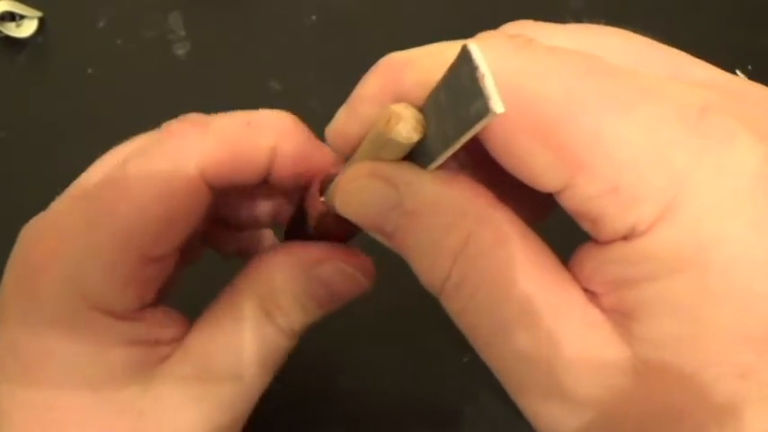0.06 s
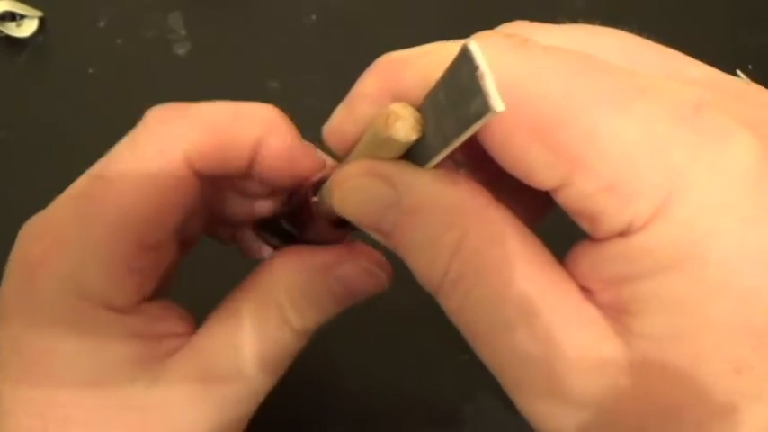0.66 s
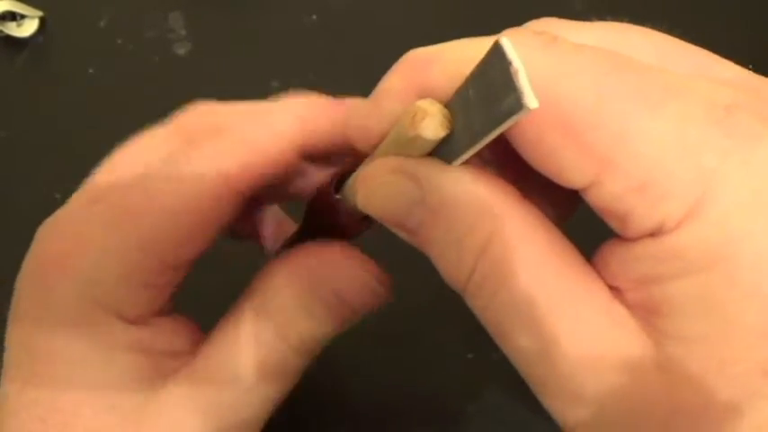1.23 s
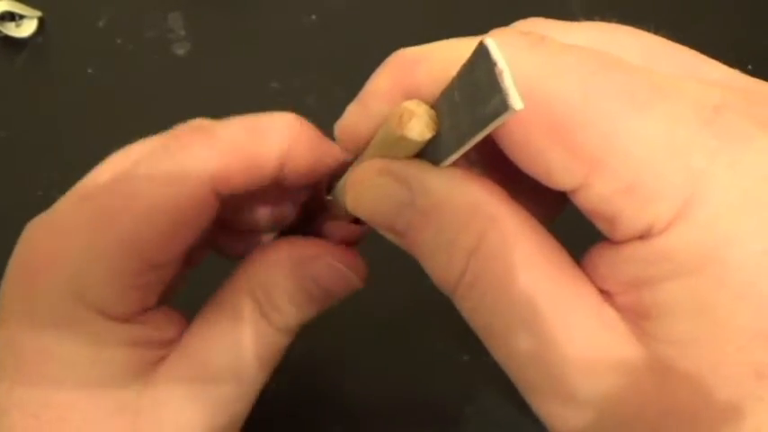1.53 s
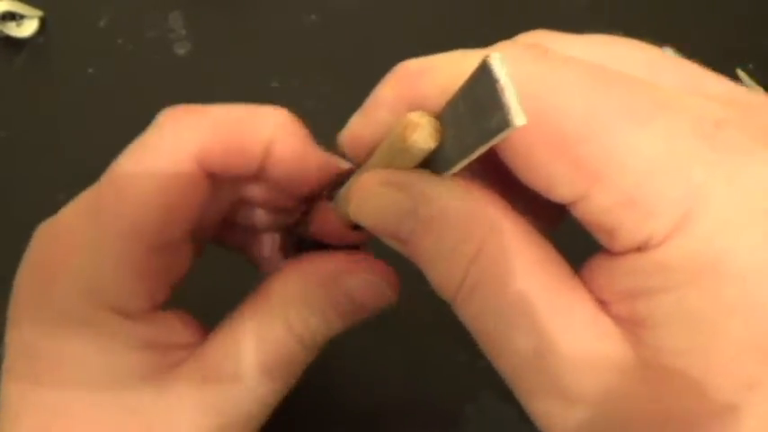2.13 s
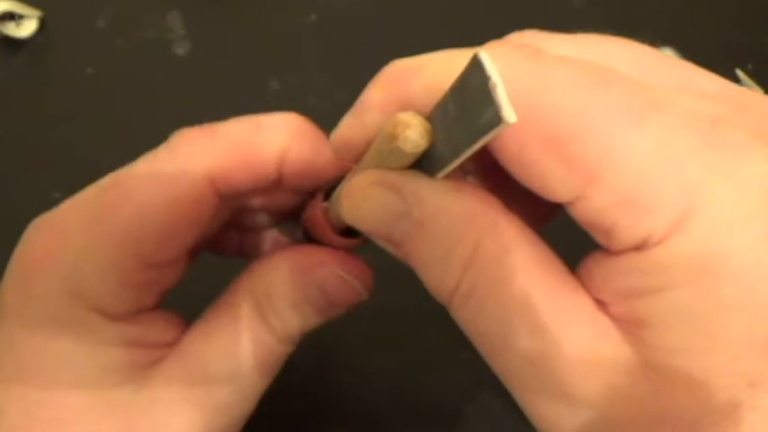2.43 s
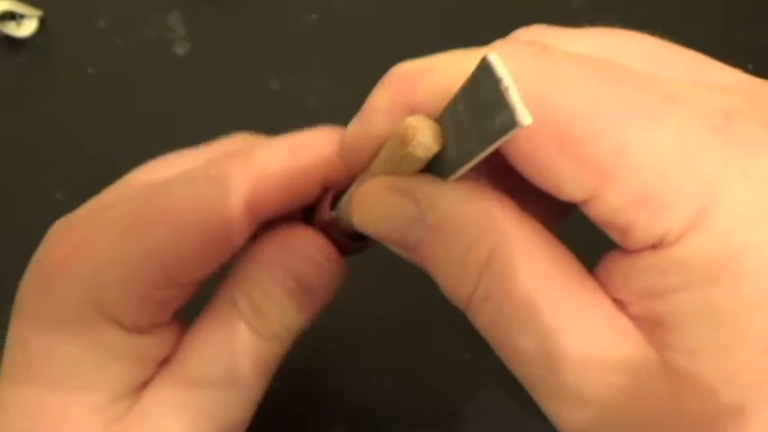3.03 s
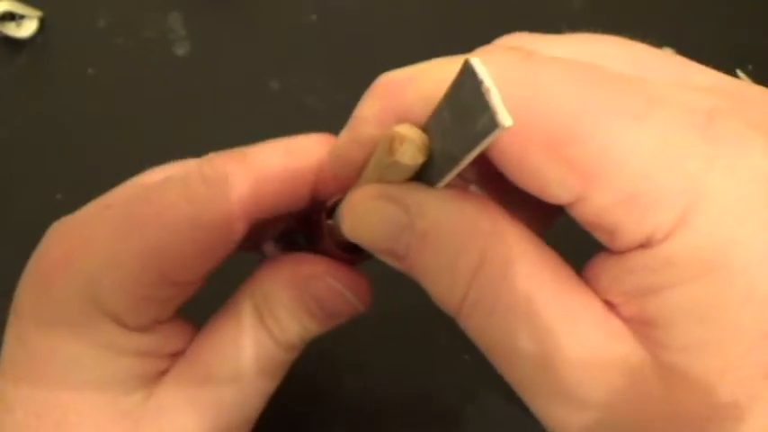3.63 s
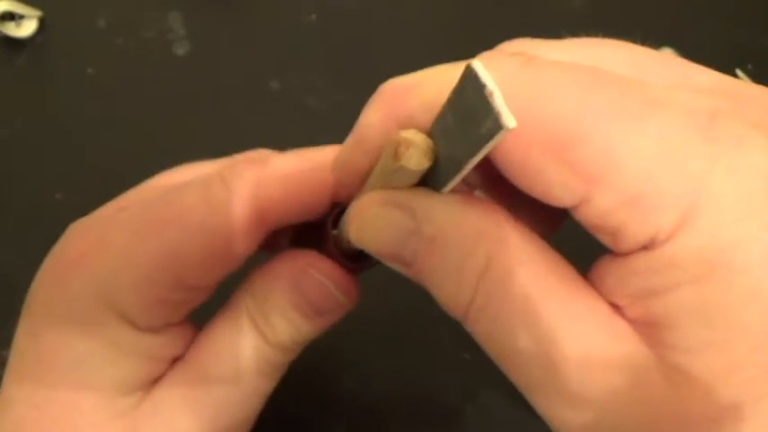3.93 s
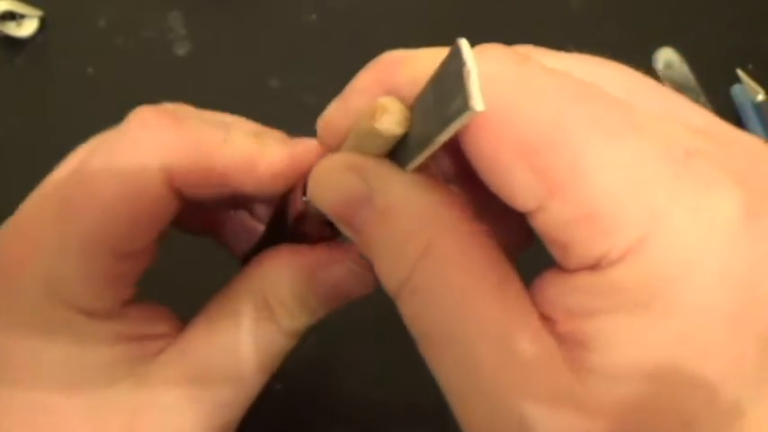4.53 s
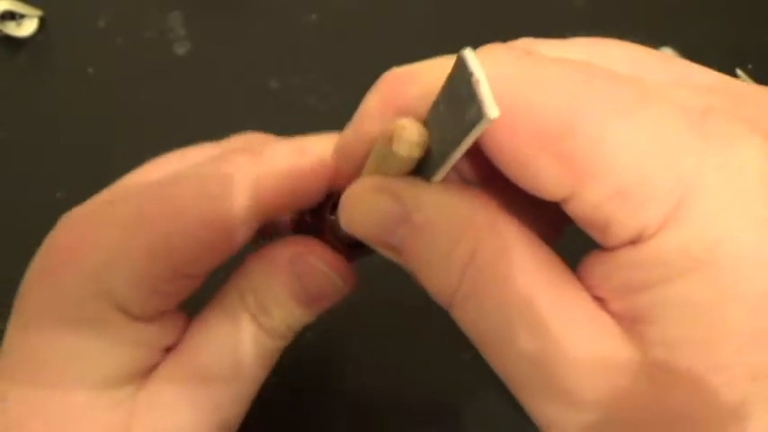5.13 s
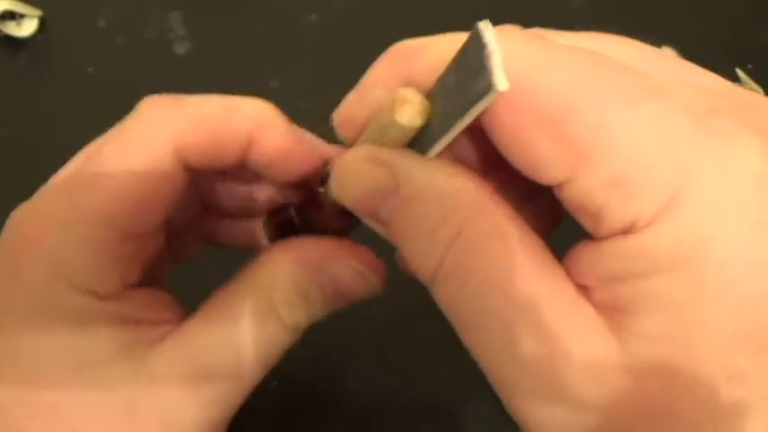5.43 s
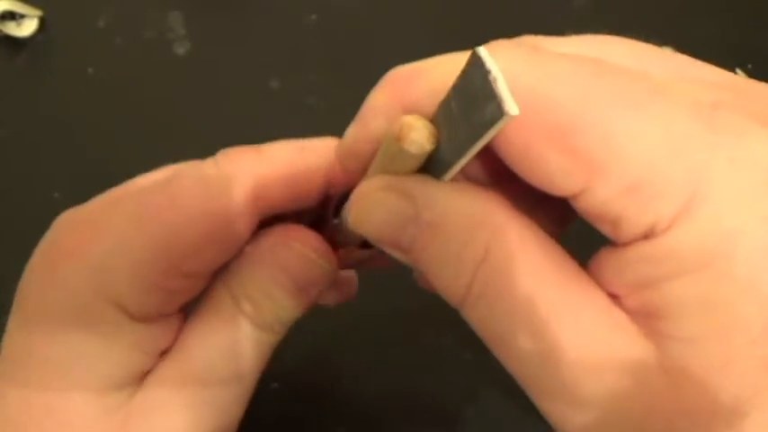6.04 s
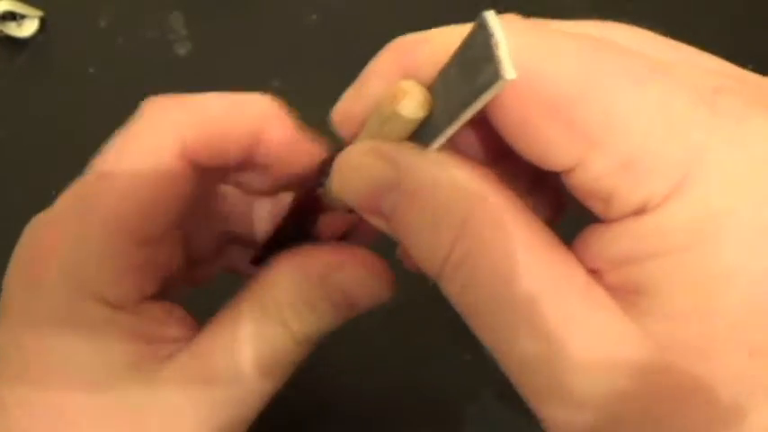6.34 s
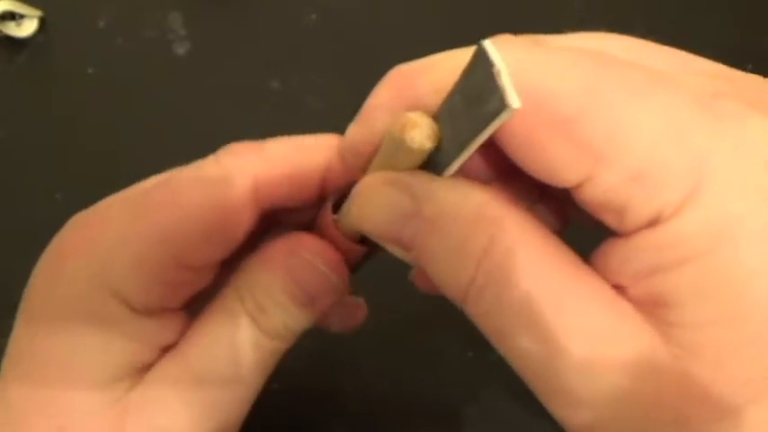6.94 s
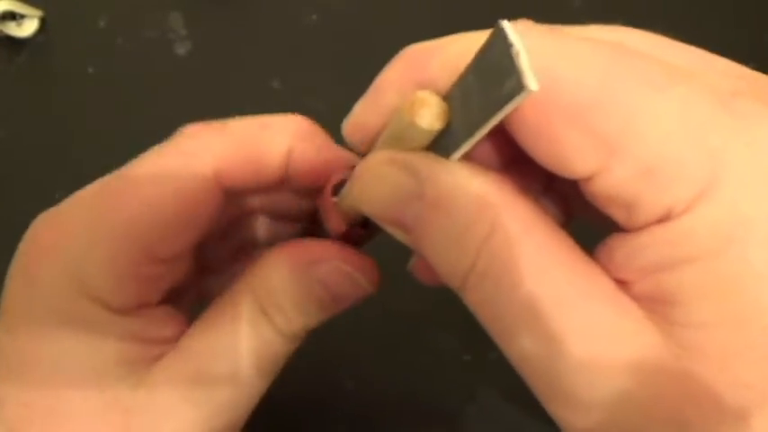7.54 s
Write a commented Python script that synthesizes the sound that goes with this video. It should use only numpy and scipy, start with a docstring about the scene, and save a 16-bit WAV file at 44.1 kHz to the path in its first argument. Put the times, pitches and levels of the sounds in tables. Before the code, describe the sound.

Wire points in a wooden tool scrape a plastic tube turned by hand, close to the microphone. The points catch and slip in dry snaps and quick stutters, with short gritty drags between them. The clicks start light, then come in sharper, uneven clusters. Fingers rub dully as the grip shifts. The small workshop adds a slight echo, a soft hum and a faint fan.

```python
"""Wire points on a plastic tube

Wire brads in a wooden tool scrape an acrylic tube turned by hand, close by. The points catch and
slip in dry snaps and short stutters, and drag with a gritty hiss in between. Tube and tool ring
briefly, fingers rub, and a small workshop echoes over a soft hum and the faint chirr of a fan."""
import sys
import numpy as np
from scipy import signal
from scipy.fft import rfft, irfft, next_fast_len
from scipy.io import wavfile
from scipy.ndimage import uniform_filter1d

SR = 44100
rng = np.random.default_rng(int(sys.argv[2]) if len(sys.argv) > 2 else 0)


def waveform_to_disk(signal):
    """Save audio, clipped to [-1, 1], as 16-bit WAV at the path in sys.argv[1]."""
    frames = np.transpose(np.atleast_2d(signal))
    scaled = np.clip(frames, -1, 1) * 32767
    samples = np.round(scaled).astype(np.int16)
    wavfile.write(sys.argv[1], SR, samples)


N = 342657


def undb(db):
    """Turn decibels into a number to multiply by."""
    return 10 ** (np.asarray(db) / 20)


def level(x, db):
    """Set a sound's average (rms) level."""
    return x * undb(db) / np.sqrt(np.mean(x ** 2))


def noise():
    """White noise as long as the scene."""
    return rng.standard_normal(N)


def wander(count):
    """A wobbly line through evenly spaced random points."""
    return np.interp(np.linspace(0, count - 1, N), np.arange(count), rng.standard_normal(count))


def colour(x, points, size=2048):
    """Shape the tone along a curve of (Hz, dB) points."""
    hz, db = np.transpose(points)
    freqs = np.maximum(np.fft.rfftfreq(size, 1 / SR), 1)
    gain = undb(np.interp(np.log(freqs), np.log(hz), db))
    # folding the cepstrum makes the filter ring only after a sound, never before
    cepstrum = irfft(np.log(gain))
    cepstrum[1:size // 2] *= 2
    cepstrum[size // 2 + 1:] = 0
    return signal.oaconvolve(x, irfft(np.exp(rfft(cepstrum))))[:len(x)]


def swells(rows, curve):
    """A loudness curve: each row swells to the middle of its three times, then fades."""
    t = np.arange(0, N, 32) / SR
    gain = sum(undb(db) * np.interp(t, np.sort(times), [0, 1, 0]) ** curve for *times, db in rows)
    return np.interp(np.arange(N) / SR, t, gain)


def ambience(air_db=-60.0, hum_hz=96, hum_db=-79):
    """Steady workshop air and hum, as mid (what both ears share) and side (how they differ)."""
    # The air's tone, then extra shaping for its side. Each row: frequency in Hz, gain in dB.
    air_tone = [(20, -4.5), (70, -3.5), (100, 1), (150, -2), (220, -7.5), (330, -7), (550, -11.5),
                (750, -11.5), (1200, -14.5), (2200, -15), (2900, -15), (5000, -18), (11000, -18.5)]
    side_tone = [(60, -20), (110, -19), (350, -4.5), (1100, 2), (3600, -1.5), (11000, -10)]
    mid, side = (level(colour(noise(), air_tone), air_db) for _ in range(2))
    hum = level(resonate(resonate(noise(), hum_hz, 19), hum_hz, 19), hum_db)
    return np.array([mid + hum, colour(side, side_tone)])


def fan(turn_hz=29.7, fade_turns=0.076, scatter_db=-2.5, chirr_db=-75):
    """A small fan chirrs faintly once a turn."""
    turns = np.arange(N) / SR * turn_hz
    sizes = undb(scatter_db * noise())[turns.astype(int)]
    rub = noise() * sizes * np.exp(-(turns % 1) / fade_turns)
    ring = resonate(rub, 2880, 220) + resonate(rub, 3470, 220)
    return level(resonate(ring, 3010, 680), chirr_db)


def room(x, wet_db, first_s=0.0073, early_s=0.024, late_db=-11, t60_s=0.56):
    """Near surfaces send back a quick cluster of echoes; the workshop rings on faintly."""
    # The echo's tone. Each row: frequency in Hz, gain in dB.
    tone = [(80, -4), (250, 4), (800, 5.5), (2000, 0.5), (3100, 2), (4200, 2.5), (5200, -2), (6300, -3),
            (8300, -2), (9600, -4.5), (11000, -4)]
    t = np.arange(SR // 2) / SR
    age = np.maximum(t - first_s, 0)
    late = undb(late_db) * np.exp(-np.log(1000) * age / t60_s)
    fade = np.hypot(np.exp(-age / early_s), late) * (t > first_s)
    echo = colour(rng.standard_normal(len(t)) * fade, tone)
    return undb(wet_db) * signal.fftconvolve(x, echo / np.linalg.norm(echo))[:N]


def fingers(uneven_db=5.0, trim_db=-1):
    """Skin rubs dully and unevenly as the fingers shift their grip and roll the tube."""
    # Finger moves. Each row: start, hardest moment and end in seconds, relative level in dB.
    moves = [(0, .05, 0.3, -67), (.65, .9, 1.3, -68), (2.1, 2.45, 3.1, -65), (3.4, 3.8, 4.2, -62.5),
             (4.15, 4.65, 5.3, -61.5), (4.85, 5.12, 5.4, -63.5), (5.6, 6.05, 6.4, -63),
             (6.7, 7.0, 7.19, -62), (7.4, 7.7, 8.1, -69)]
    # The rub's tone. Each row: frequency in Hz, gain in dB.
    tone = [(40, -24.5), (80, 7), (140, 5), (230, -1), (350, 1.5), (700, -3), (1200, -4.5), (2500, -25),
            (10000, -29)]
    grip = swells(moves, curve=0.82) * undb(uneven_db * wander(count=400))
    return level(colour(noise(), tone), trim_db) * grip


def resonate(x, hz, width_hz):
    """Ring at one pitch; a narrower width rings longer."""
    return signal.lfilter(*signal.iirpeak(hz, hz / width_hz, fs=SR), x)


def body(force, direct_db, grip_spread=0.013):
    """Tube and tool ring; the grip shifts their pitches a little from touch to touch."""
    # Their natural tones. Each row: pitch in Hz, width in Hz, gain in dB.
    modes = [(317, 170, -4), (634, 120, -4), (1486, 370, -2), (2770, 570, -7.5), (2995, 280, -3),
             (4190, 340, -2.5), (5200, 310, -5.5), (6310, 360, -1), (7180, 540, -9), (8210, 620, 1),
             (9650, 650, 0.5), (11320, 1600, -1.5)]
    shifts = 1 + grip_spread * rng.standard_normal(len(modes))
    rings = (undb(db) * resonate(force, hz * shift, width)
             for (hz, width, db), shift in zip(modes, shifts))
    return undb(direct_db) * force + sum(rings)


def grit(loudness, grains_per_s=1200, grain_db=3.5, hiss_db=-3, flicker_db=4.0, trim_db=2.5):
    """Tiny cracks over a hiss: the scrape of a sliding point, or the rough tail of a loud snap."""
    # The grit's tone. Each row: frequency in Hz, gain in dB.
    tone = [(100, -17), (700, -3), (1500, -3.5), (3000, 3.5), (5000, 0), (8000, -0.5), (11000, 3)]
    flicker = undb(flicker_db * wander(count=2200))
    sizes = undb(grain_db * np.minimum(rng.exponential(size=N), 4)) * np.sign(noise())
    cracks = level(sizes * (rng.random(N) < grains_per_s / SR), 0)
    rasp = body(cracks + undb(hiss_db) * noise(), direct_db=8)
    return loudness * flicker * level(colour(rasp, tone), trim_db)


def ticks(loudness, tries=90, over_grit_db=-3, scatter_db=6.5, length_ms=1.1,
          low_hz=2700, high_hz=4700, bright_db=-2, thud_db=-3):
    """Rows for slips(): faint chance catches in the grit, stronger where it is louder."""
    rows = []
    for when, wire, luck in rng.random((tries, 3)):
        at = int(when * N)
        if loudness[at] > 0:
            db = 20 * np.log10(loudness[at]) + over_grit_db + scatter_db * (2 * luck - 1)
            wire_hz = low_hz + wire * (high_hz - low_hz)
            rows.append((at / SR, length_ms, wire_hz, db, bright_db, thud_db))
    return rows


def stutters(length_ms=0.46, thud_db=-2.5):
    """Rows for slips(): a point catches again and again at an even pace, growing or fading."""
    # Each row: first and last catch in seconds, number of catches, wire pitch in Hz,
    # first and last strength in dB, brightness in dB.
    runs = [(1.12, 1.151, 4, 4030, -53.5, -51.5, 2.5), (2.311, 2.3383, 5, 2900, -44.5, -41, -9),
            (2.405, 2.4107, 2, 2850, -51, -48.5, -8.5), (2.4684, 2.478, 2, 2860, -45, -52, -10.5),
            (2.8724, 2.894, 3, 4358, -37.5, -26.5, -7), (3.712, 3.7704, 3, 4300, -46.5, -41, -8),
            (4.0698, 4.078, 2, 4130, -53, -50, -10), (4.478, 4.513, 3, 2900, -45.5, -42, -3)]
    rows = []
    for first, last, catches, wire_hz, first_db, last_db, bright_db in runs:
        for start, db in np.linspace((first, first_db), (last, last_db), catches):
            rows.append((start, length_ms, wire_hz, db, bright_db, thud_db))
    return rows


def even_out(x, amount):
    """A sharp crack spreads its energy more evenly over the frequencies."""
    spectrum = rfft(x)
    power = uniform_filter1d(np.abs(spectrum) ** 2, size=7)
    return irfft(spectrum / np.maximum(power / power.mean(), 1e-6) ** (amount / 2))


def weigh(x, band_db):
    """Bring five bands of a snap toward the given levels, counting its energy over 10 ms."""
    # The borders in Hz of the bands, low to high: thump, knock, ring, rasp and edge.
    borders = [80, 700, 2200, 4800, 7500, 11200]
    edges = np.array(borders)
    centres = (edges[1:] + edges[:-1]) / 2
    for _ in range(2):
        power = np.abs(rfft(x)) ** 2
        energy = np.add.reduceat(power, edges * len(x) // SR)[:-1] * 2 / len(x)
        now_db = 10 * np.log10(energy / (SR / 100))
        x = colour(x, np.c_[centres, band_db - now_db], size=512)
    return x


def slips(rows, rise_s=0.00035, release_s=0.0015, hold_share=0.89, wire_db=4.5, firm_db=-30,
          bench_s=0.0027, bench_db=-14, thump_db=-7, thump_hz=145, thump_s=0.0075, trim_db=1.0):
    """A point breaks free, chatters over the plastic for an instant, and catches again."""
    # Harder slips gain more treble than bass. Each row is one band of weigh(): relative level in dB
    # for a firm slip, then dB added per dB of strength, of brightness and of thud.
    voicing = [(-51, 0.63, 0.32, 1.04), (-47, 0.7153, -.34, 0.8), (-36, 1, -0.61, 0), (-38, 1, 0.35, 0),
               (-34, 1, 0.33, 0)]
    # The small tube gives off little deep bass. Each row: frequency in Hz, gain in dB.
    tone = [(30, -20), (60, -2.5), (110, 1), (170, 2), (400, -3), (900, -2), (1600, -1), (3000, -0.5),
            (11000, -1.5)]
    size, lead = 1536, 100  # samples
    t = (np.arange(size) - lead) / SR
    age = np.maximum(t, 0)
    out = np.zeros(N + lead + size)
    for start, length_ms, wire_hz, strength_db, bright_db, thud_db in rows:
        hold_s = hold_share * length_ms / 1000
        chatter, push = rng.standard_normal((2, size))
        slide = np.minimum(age / rise_s, 1) * np.exp(-np.maximum(t - hold_s, 0) / release_s)
        force = even_out(chatter * slide, amount=0.23)
        # the wire that caught adds its own short ring
        snap = body(force, direct_db=-7) + undb(wire_db) * resonate(force, wire_hz, width_hz=520)
        # the jolt runs into the hands as a soft thump
        jolt = push * (t > 0) * np.exp(-age / thump_s)
        snap += undb(thump_db) * resonate(resonate(jolt, thump_hz, 104), thump_hz, 150)
        # the bench just below bounces the sound back
        snap += undb(bench_db) * np.interp(t - bench_s, t, snap, left=0)
        band_db = np.array(voicing) @ [1, strength_db - firm_db, bright_db, thud_db]
        at = int(start * SR)
        out[at:at + size] += weigh(snap, band_db + trim_db)
    return colour(out[lead:lead + N], tone)


def scene():
    """The handwork sits in the middle; echo and air spread to the sides."""
    # Gritty scrapes swell and fade; five are the rough ringing tails of loud snaps. Each row: three
    # times in seconds (earliest is the start, middle the peak, latest the end), relative level in dB.
    grit_swells = [(.02, .1, .16, -44.5), (.15, .185, 0.21, -47.5), (.22, .255, 0.28, -51),
                   (.417, .43, 0.442, -51.5), (.715, .735, 0.89, -58), (.83, .875, 1.02, -47.5),
                   (1.0, 1.085, 1.1, -50), (1.385, 1.445, 1.51, -46.5), (1.48, 1.53, 1.63, -53),
                   (2.17, 2.19, 2.3, -56.5), (2.27, 2.33, 2.48, -55.5), (2.553, 2.565, 2.656, -42),
                   (3.3, 3.36, 3.48, -55.5), (3.826, 3.835, 3.94, -45.5), (4.13, 4.29, 4.52, -52),
                   (4.37, 4.455, 4.58, -48), (4.66, 4.75, 4.8, -53), (5.05, 5.17, 5.25, -61),
                   (5.47, 5.5, 5.6, -59.5), (5.58, 5.59, 5.75, -48.5), (5.89, 5.905, 5.84, -40),
                   (6.12, 6.22, 6.28, -58.5), (6.38, 6.42, 6.53, -48.5), (7.32, 7.41, 8.1, -63),
                   (7.46, 7.47, 7.59, -45.5)]
    # The main slips. Each row: start in seconds, rough length in milliseconds, wire pitch in Hz,
    # then strength, brightness and thud into the hands, all in relative dB.
    snaps = [(0.0456, 2.6, 4660, -43.5, 1, -0.5), (0.0584, 4.3, 4550, -40.5, -4, -5),
             (0.0977, 5, 4330, -36, -1.5, -3.5), (0.1954, 2.6, 4150, -43.5, -3.5, -4),
             (0.599, 1.2, 3210, -55, 4, -5), (0.7215, 3.5, 3640, -36, -2.5, 2.5),
             (0.766, 2.6, 3270, -52.5, -3, 4.5), (0.8359, 3.8, 3700, -33.0, -2.5, -1),
             (0.8633, 2.1, 5230, -35.5, 3.5, 3), (0.8863, 6, 4480, -39, -2, -8),
             (1.065, 4.6, 2950, -46, -6, -6), (1.0885, 1.7, 6500, -35.5, 0.5, -0.5),
             (1.4438, 3.8, 4300, -40.5, -2, -7), (1.5918, 1.5, 2860, -47.5, -9, -3),
             (1.6191, 5.3, 3370, -40.5, -4, -2), (1.6402, 0.57, 6700, -25, 4, -1.5),
             (1.703, 0.52, 4120, -28.5, -6, -0.5), (1.7547, 4.7, 4200, -32.5, -3, 1),
             (2.5125, 0.49, 2840, -32, -2.5, -7), (2.5402, 0.5, 2820, -34, -5, -3.5),
             (2.5572, 3.3, 3870, -20, -2, -1), (2.8158, 1.6, 3850, -31, -2, -4.5),
             (2.8185, 0.7, 4000, -31, 1.5, -8), (2.9059, 1.5, 6100, -22.5, 4, -7),
             (2.911, 4.1, 6600, -32.5, 3, 3), (3.075, 1.5, 2950, -55.5, -11, -7),
             (3.3483, 3.3, 3770, -49.5, -7, 0.5), (3.432, 2, 3980, -52.5, -5, 2.5),
             (3.4936, 1.1, 2570, -34.0, -6, -3), (3.5521, 3.1, 2650, -25.5, -2, 7),
             (3.8114, 0.4, 4320, -35.5, -4, -3), (3.8325, 1.6, 2960, -20, -4, -3.5),
             (3.9711, 2.9, 2794, -32, -3, -1.5), (4.09, 0.89, 3980, -25.5, 1, -2.5),
             (4.2296, 6, 4820, -41, -1, 4), (4.2656, 0.7, 2820, -36, 5, 2),
             (4.2925, 5.5, 4410, -40.0, 4, 3.5), (4.3388, 4, 4390, -41.0, -1, 0.5),
             (4.3883, 0.5, 2780, -33.5, 1, 5), (4.4177, 0.71, 2920, -36, 0.5, 9),
             (4.4472, 1.8, 3480, -33.5, -4, 6), (4.4645, 1.7, 3010, -43, -3, 11),
             (4.6896, 1, 4670, -45.5, 1.5, 5), (4.711, 3.4, 2620, -51.5, 1, 12.5),
             (4.7331, 4.6, 4370, -30, -3, 0), (4.7524, 0.65, 5300, -32, 3, 2),
             (4.7895, 0.38, 5130, -25.5, 5.5, 0), (4.817, 0.63, 4370, -27, -3.5, -1.5),
             (4.8409, 1.6, 3100, -34.5, -3, 8), (4.8703, 0.66, 4530, -24.5, -0.5, 6),
             (4.988, 1.9, 5003, -23.0, 3.5, -0.5), (5.1685, 1.5, 3340, -58, 3, 11.5),
             (5.5796, 2.2, 2800, -23.5, 3, 4.5), (5.6388, 0.67, 5840, -25.5, 10, -6),
             (5.6706, 0.89, 6290, -36.5, 4, 1.5), (5.6936, 1.4, 2920, -48.5, -3, 8.5),
             (5.7884, 4.2, 6030, -21.5, 6.5, -1), (5.893, 3.14, 5600, -22.5, 11, -1),
             (5.9215, 2.4, 2950, -42, -6, -7), (5.9451, 2, 3570, -35.5, -4, -1),
             (6.002, 0.3, 6715, -34.5, 0, -2), (6.0349, 3.9, 5380, -36.5, 1, 0),
             (6.46, 1.3, 6100, -40.5, 3.5, -6.5), (6.5752, 0.72, 5940, -24.0, 5, -0.5),
             (6.6474, 1.5, 6200, -23.5, 7, 2.5), (6.8022, 0.68, 4120, -31.5, 6.5, -1.5),
             (6.8277, 2.4, 2880, -46, -1, -10), (6.8645, 1.3, 5860, -24.5, 6, 1),
             (7.0757, 0.45, 3270, -60, 6, 2), (7.4668, 2.6, 3430, -21, 2, 4),
             (7.564, 3.3, 3660, -38.5, -1, 4), (7.654, 0.8, 6360, -36, 1, -6),
             (7.7365, 0.76, 5930, -24, 3.5, 1.5)]
    # How much near sound reaches the side. Each row: frequency in Hz, gain in dB.
    side_tone = [(150, -19), (600, -16.5), (1300, -12.5), (3000, -14), (4500, -19.5), (6300, -17.5),
                 (7400, -13), (8500, -11), (9600, -24), (11000, -17.5)]
    loudness = swells(grit_swells, curve=0.97)
    work = slips([*snaps, *stutters()]) + grit(loudness) + fingers()
    air_mid, air_side = ambience()
    mid = work + room(work, wet_db=-16.5) + air_mid + fan()
    # left and right hear the near sound slightly out of step
    near_side = np.imag(signal.hilbert(colour(work, side_tone), next_fast_len(N)))[:N]
    side = near_side + room(work, wet_db=-23) + air_side
    # the ticks are too faint to stir the room
    mid += slips(ticks(loudness))
    return np.array([mid + side, mid - side])


def record(dry, top_hz=11080):
    """Cut off the highest treble steeply."""
    lowpass = signal.firwin(201, top_hz, fs=SR)
    return signal.oaconvolve(dry, lowpass[None], mode="same", axes=-1)


dry = scene()
out = record(dry)
waveform_to_disk(out)
```